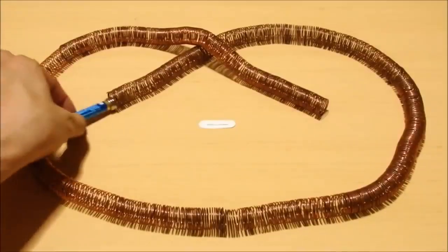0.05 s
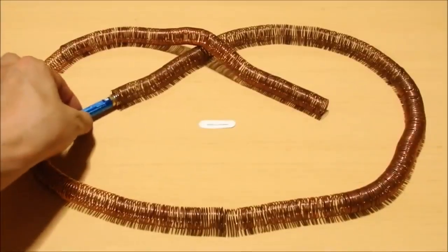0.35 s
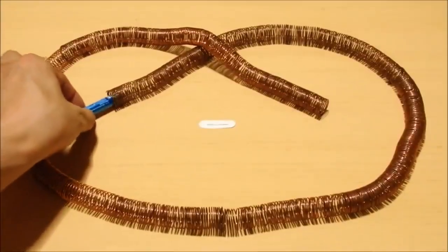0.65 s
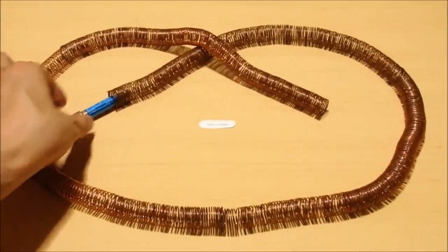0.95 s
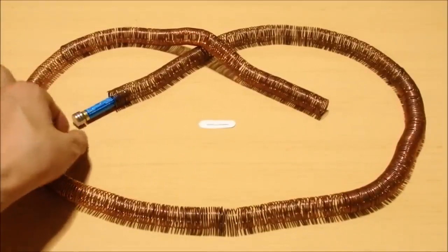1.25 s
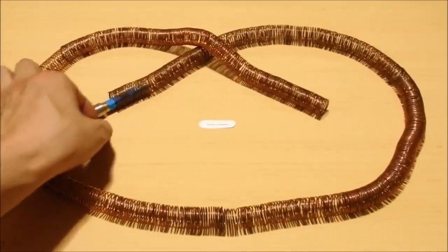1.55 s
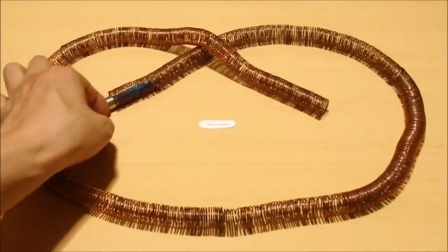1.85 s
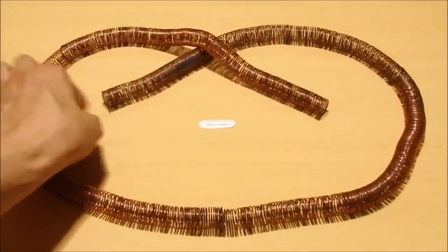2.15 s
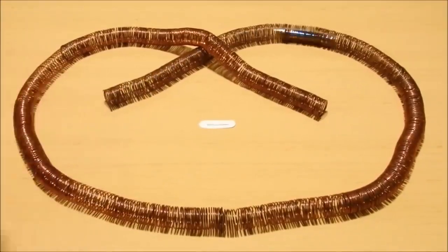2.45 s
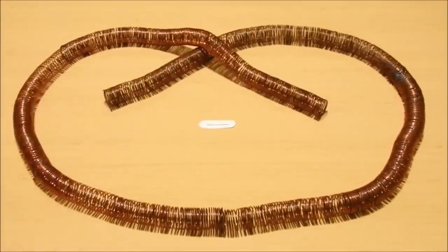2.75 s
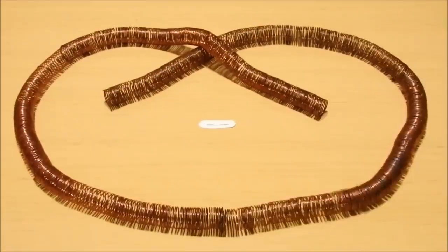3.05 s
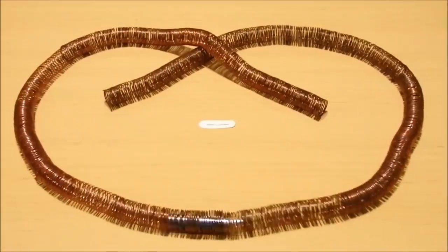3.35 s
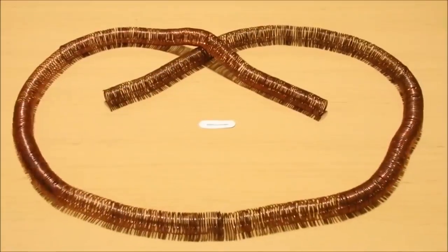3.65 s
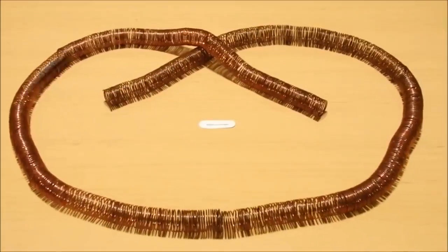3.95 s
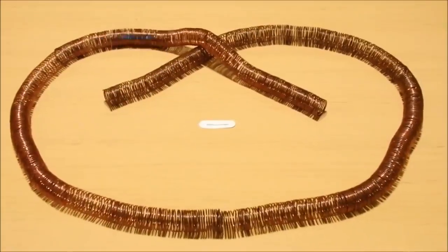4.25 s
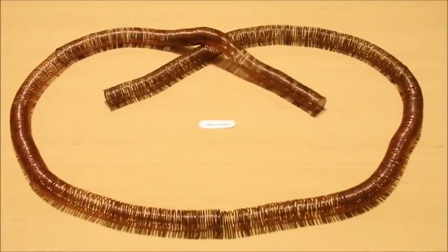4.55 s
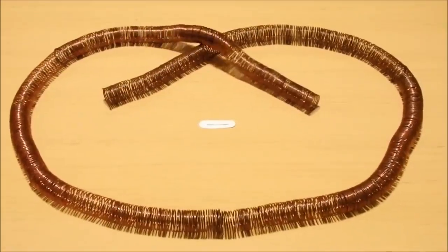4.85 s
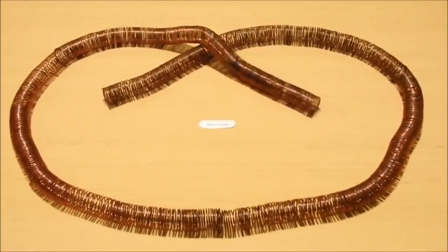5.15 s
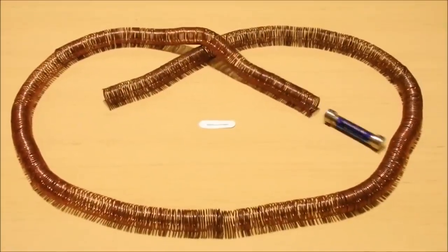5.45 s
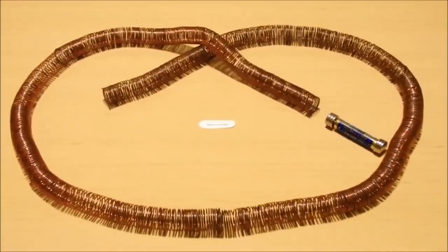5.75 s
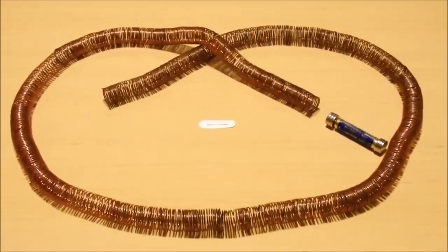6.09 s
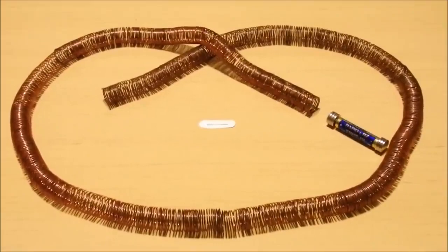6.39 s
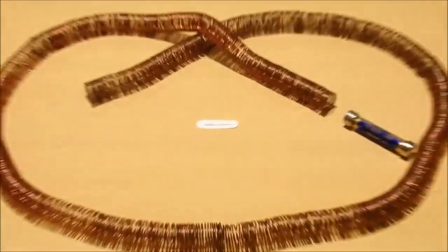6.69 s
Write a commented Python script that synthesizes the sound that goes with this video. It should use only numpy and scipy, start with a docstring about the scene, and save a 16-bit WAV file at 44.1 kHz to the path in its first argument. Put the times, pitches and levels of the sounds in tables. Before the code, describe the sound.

A small battery with magnets clacks into a copper coil, rushes through with a loud metallic rasp, then drops onto a wooden table.

```python
"""A low hum, rumble and hiss fill a small room. With snaps and scrapes, a battery with a magnet on each
end is fed by hand into a bare copper coil on a wooden table. It shoots along, its impacts on the turns
exciting the modes of wire, coil and table; it slows at the crossing, drops out and clacks to rest.
The hum fades midway. At the end a camera is handled: its housing clicks and its zoom whirrs."""
import sys
import numpy as np
from scipy import signal
from scipy.fft import rfft, irfft, next_fast_len
from scipy.io import wavfile
from scipy.ndimage import uniform_filter1d, map_coordinates

SR = 44100
rng = np.random.default_rng(int(sys.argv[2]) if len(sys.argv) > 2 else 0)


def persist_wave(psi):
    """Save psi, clipped to +-1, as 16-bit WAV."""
    counts = np.round(np.clip(psi, -1, 1) * 32767).astype(np.int16)
    wavfile.write(sys.argv[1], SR, np.atleast_2d(counts).T)


N = 300894
TIME = np.arange(N) / SR
LAUNCH_S, EXIT_S, REST_S = 2.17, 5.455, 5.6

# Vigour of the run. Each row: time in seconds, wire level in dB, table level in dB.
RUN_LEVELS = [(2.2, -29, -33), (2.42, -23, -29), (2.46, -22.5, -35), (2.7, -25.5, -31.5),
              (2.75, -24.5, -30.5), (2.83, -25, -40), (2.84, -26, -32.5), (3.02, -29.5, -38.5),
              (3.24, -24, -33.5), (3.31, -29, -40), (3.49, -24, -30.5), (3.51, -27.5, -35.5),
              (3.72, -25.5, -31), (3.76, -24.5, -36.5), (4.14, -23.5, -30), (4.27, -25.5, -37),
              (4.33, -30, -31), (4.48, -24.5, -36.5), (4.56, -25, -33), (4.68, -36, -44.5),
              (4.83, -44, -48.5), (5.15, -37, -45), (5.16, -28.5, -34.5), (5.2, -34.5, -44.5),
              (5.4, -23.5, -30), (5.46, -27, -34)]
# Spectrum of rasping wire. Each row: frequency in Hz, gain in dB.
WIRE_SPECTRUM = [(300, -22), (1200, -26), (2500, -7.5), (4000, -4.5), (5200, 0), (6300, 0), (7300, -0.5),
                 (8800, -3.5), (10000, -8), (12000, -16), (15000, -14.5), (16500, -52)]
# Normal modes of the coil. Each row: frequency in Hz, bandwidth in Hz, gain in dB.
COIL_RESONANCES = [(1946, 112, 3), (2334, 280, 4.5), (2538, 85, 5), (2916, 127, 7.5), (3497, 390, 6),
                   (4045, 360, 4), (4514, 85, 1)]


def from_db(db):
    """Amplitude ratio of a level in decibels."""
    return 10 ** (np.asarray(db) / 20)


def rms_one(x):
    """Normalisation to unit mean power."""
    return x / np.sqrt(np.mean(x ** 2) + 1e-20)


def even(x, window_s=0.14):
    """Normalisation by running power, which keeps the fast grain."""
    power = np.abs(uniform_filter1d(x * x, size=int(window_s * SR)))
    return x / np.sqrt(power + 1e-3 * np.mean(x * x))


def drift(per_s):
    """Slow random modulation of unit power."""
    knots = rng.standard_normal(4096)
    return rms_one(map_coordinates(knots, [TIME * per_s], order=1, mode="wrap"))


def stroke(s, length, attack=0.05, release=0.034):
    """Envelope of a rub: rise until s, hold, exponential decay; all in seconds."""
    rise = np.clip(1 + (TIME - s) / attack, 0, 1) ** 2
    return rise * np.exp(-np.maximum(TIME - s - length, 0) / release)


def colour(x, points):
    """Minimum-phase filtering through (Hz, dB) points, by folding the cepstrum."""
    size = 2 * next_fast_len(len(x) // 2 + 4096)
    hz, db = np.transpose(points)
    grid = np.maximum(np.arange(size // 2 + 1) * SR / size, 1)
    cepstrum = irfft(np.log(from_db(np.interp(np.log(grid), np.log(hz), db))))
    cepstrum[1:size // 2] *= 2
    cepstrum[size // 2 + 1:] = 0
    return irfft(rfft(x, size) * np.exp(rfft(cepstrum)))[:len(x)]


def resonate(x, modes):
    """Superposition of damped resonators, each given as (Hz, bandwidth in Hz, dB)."""
    out = 0
    for hz, width, db in modes:
        r = np.exp(-np.pi * width / SR)
        poles = [1, -2 * r * np.cos(2 * np.pi * hz / SR), r * r]
        out += from_db(db) * (1 - r * r) / 2 * signal.lfilter([1, 0, -1], poles, x + 1e-18)
    return out


def burst(t60):
    """Dense modes decaying together act as damped noise, here of unit energy."""
    t = TIME[:SR // 2]
    ring = rng.standard_normal(len(t)) * from_db(-60 * t / t60)
    return ring / np.linalg.norm(ring)


def travelling(x, t60, size=16384):
    """A moving source meets a changing impulse response: each overlapping stretch gets its own."""
    out, window = np.zeros(N + 4 * size + SR), signal.windows.cosine(size)
    x = np.pad(x, size)
    for start in range(0, N + size, size // 2):
        rung = signal.fftconvolve(x[start:start + size] * window, burst(t60))
        out[start:start + len(rung)] += rung
    return out[size:size + N]


def add(track, s, db, sound):
    """Superpose a sound at s seconds with its loudest 3 ms at the given level."""
    top = np.sqrt(uniform_filter1d(sound ** 2, size=132).max())
    start = int(s * SR)
    track[start:start + len(sound)] += (from_db(db) * sound / top)[:N - start]


def rumble():
    """Room rumble is noise with its power in the bass."""
    # Each row: frequency in Hz, gain in dB.
    spectrum = [(15, -16), (35, -5.5), (55, 5.5), (75, -2.5), (110, -7), (200, -16.5), (350, -25.5),
                (1000, -56.5)]
    return from_db(-49) * rms_one(colour(rng.standard_normal(N), spectrum))


def hum(hz=51.4):
    """A harmonic series wavers by slow frequency and amplitude modulation, and fades midway."""
    # Course of the hum. Each row: time in seconds, level in dB.
    course = [(0, -47.5), (2.2, -40), (3.1, -42), (3.4, -62)]
    # Each row: harmonic number, relative level in dB.
    partials = [(1, -3), (2, -12), (3, -15)]
    phase = 2 * np.pi * np.cumsum(hz * (1 + 0.0096 * drift(5.8))) / SR
    tone = sum(np.sqrt(2) * from_db(db + 2.1 * drift(8.6)) * np.sin(k * phase) for k, db in partials)
    return from_db(np.interp(TIME, *np.transpose(course))) * tone


def hiss():
    """Air and microphone give stationary broadband noise."""
    # Each row: frequency in Hz, gain in dB.
    spectrum = [(150, -45), (250, -4.5), (434, -10.5), (614, 1.5), (692, -6.5), (768, 0.5), (913, -14),
                (1140, -3), (1270, -13), (1380, -6), (1760, -12.5), (2660, -13), (3890, -7), (10100, -13.5),
                (15500, -17.5)]
    return from_db(-56) * rms_one(colour(rng.standard_normal(N), spectrum))


def snaps(wire, catches_per_s=8, catch_db=9.5, spread_db=3):
    """Brief contact gives a bright spectrum: a magnet snaps on the wire, with lesser random catches."""
    # Each row: start in seconds, relative level in dB.
    main_snaps = [(0.220, -39), (0.545, -26), (0.607, -29), (2.158, -19), (2.1688, -10.5), (2.495, -4),
                  (2.61, -7.5), (2.791, -8.5), (2.875, -10), (3.036, -14), (3.84, -8), (4.008, -12),
                  (4.43, -9), (4.880, -23), (5.158, -8.5), (5.381, -9.5)]
    # Each row: frequency in Hz, gain in dB.
    spectrum = [(500, -27), (2000, -24), (4500, -2), (7000, 9.5), (9000, 2.5), (12000, -6), (16000, -52.5)]
    out = np.zeros(N)
    when, strength = rng.random((int(catches_per_s * (EXIT_S - LAUNCH_S)), 2)).T
    times = LAUNCH_S + when * (EXIT_S - LAUNCH_S)
    levels = 20 * np.log10(np.interp(times, TIME, wire)) + catch_db + spread_db * (2 * strength - 1)
    for s, db in [*main_snaps, *zip(times, levels)]:
        add(out, s, db - 7, colour(burst(t60=0.013), spectrum))
    return out


def tabletop(force, near):
    """The driving point (0 far side, 1 near side) sets how strongly each mode of the table responds."""
    # Each row: frequency in Hz, bandwidth in Hz, gain in dB struck far, gain in dB struck near.
    modes = [(79, 26, -19, -2.5), (137, 26, -11, -5), (184, 32, -3, -6.5), (230.3, 23.6, 4, 1.5),
             (302, 46, -2, -6.5), (356, 36.4, 1.5, -7), (436, 23, -2.5, -13), (506, 46, -3, -9),
             (627, 144, -13.5, -15.5), (770, 93, -10.5, -11.5), (987, 103, -17, -14), (1301, 73, -16, -17)]
    near = np.clip(near, 0, 1)
    return sum((-1) ** k * from_db(far_db + near * (near_db - far_db)) * resonate(force, [(hz, width, 0)])
               for k, (hz, width, far_db, near_db) in enumerate(modes))


def table_thud():
    """Impulse response of the table: ringing modes over a dead thump."""
    # Each row: frequency in Hz, gain in dB.
    thump_spectrum = [(60, -13.5), (220, -2), (400, -3), (600, -2), (950, 1), (1200, -9), (3000, -39.5)]
    blow = signal.unit_impulse(SR // 2)
    return tabletop(blow, near=0.21) + from_db(-7) * colour(blow, thump_spectrum)


def hand_bumps(cutoff_hz=420):
    """Soft flesh damps the treble of a blow on the table, acting as a low-pass filter."""
    # Each row: start in seconds, level in dB.
    bumps = [(0.335, -43), (1.39, -41), (1.61, -39), (1.712, -28.5)]
    out = np.zeros(N)
    soft_thud = signal.sosfilt(signal.butter(2, cutoff_hz, fs=SR, output="sos"), table_thud())
    for s, db in bumps:
        add(out, s, db, soft_thud)
    return out


def rasp(per_s, spread_db, ring_t60, rub_db):
    """Shot noise: random contacts excite wire modes over steady friction. Returns clicks and ringing."""
    touched = rng.random(N) < per_s / SR
    strength = from_db(spread_db * np.clip(rng.standard_normal(N), -2, 2))
    clicks = touched * strength * rng.choice([-1, 1], N)
    decay = np.exp(-np.log(1e6) / (ring_t60 * SR))
    energy = signal.lfilter([1], [1, -decay], clicks ** 2 + 1e-12)
    share = energy / uniform_filter1d(energy, size=SR // 12)
    return clicks, np.sqrt(np.abs(share) + from_db(rub_db) ** 2) * rng.standard_normal(N)


def coil_mouth():
    """Friction sustains a narrow resonance of the free turns at the mouth of the coil."""
    # Each row: frequency in Hz, bandwidth in Hz, gain in dB.
    modes = [(2306, 11, 0)]
    return even(resonate(rng.standard_normal(N), modes))


def feeding(hand_from_s=0.24, hand_db=-54.5):
    """Frictional excitation: the slowly pushed magnet catches on single turns; the hand rubs the wood."""
    # Each row: start in seconds, length in seconds, wire level in dB, table level in dB.
    pushes = [(0.56, 0.004, -52, -71), (0.603, 0.034, -51, -58), (0.883, 0.064, -60.5, -52),
              (1.594, 0.12, -49, -39), (1.795, 0.027, -54.5, -32.5), (2.095, 0.077, -54.5, -42.5)]
    wire, table = sum(np.outer(from_db(levels), stroke(s, length)) for s, length, *levels in pushes)
    _, rings = rasp(per_s=98, spread_db=12.5, ring_t60=0.0077, rub_db=7.0)
    ticks = from_db(0.5) * even(colour(rings, WIRE_SPECTRUM))
    coil = from_db(3.5) * even(resonate(rings, COIL_RESONANCES))
    zing = from_db(-4) * even(resonate(rings, [(6290, 53, 26), (6740, 190, -30)]))  # single turns
    wood = even(tabletop(rng.standard_normal(N), near=0))
    hand = from_db(hand_db) * stroke(hand_from_s, LAUNCH_S - hand_from_s, attack=0.15)
    sing = from_db(-3) * coil_mouth()
    return wire * (ticks + coil + zing + sing) + wood * (from_db(-4) * table + hand)


def knocks(rebound_s=0.0105, rebounds=3):
    """Impact and rebound: the battery's ends strike in turn, each with a clack, thud and metal crack."""
    # Each row: start in seconds, clack level in dB, clack centre in Hz, thud level in dB,
    # crack level in dB, the clack's loss per rebound in dB.
    impacts = [(0.896, -46, 2350, -40, -54, 14), (1.011, -41, 2400, -35, -53, 14),
               (1.0211, -17, 2400, -17.5, -23, 7.5), (1.71, -43, 2000, -31.5, -39, 4),
               (1.817, -34, 2140, -28, -33.5, 3), (3.04, -39, 1400, -30, -38, 5),
               (3.166, -31, 1710, -26.5, -44, 6), (3.43, -36.5, 1700, -31, -43, 7),
               (3.465, -34.5, 1510, -28, -30, 7), (3.67, -40, 1820, -32, -41, 0),
               (3.887, -31, 1650, -25.5, -20, 9), (4.14, -35, 1800, -25, -29, -0.5),
               (4.554, -33, 1710, -34, -38.5, 6), (5.4761, -17, 4170, -28, -14, 6),
               (5.606, -15, 3230, -20, -24, 1)]
    # Each row: frequency in Hz, gain in dB.
    crack_spectrum = [(500, 5), (1500, 9.5), (4000, 13), (7000, 8), (9000, -2), (12000, -20), (16000, -37)]
    out, thud = np.zeros(N), table_thud()
    for s, clack_db, hz, thud_db, crack_db, loss_db in impacts:
        band = signal.butter(3, [hz * 0.69, min(hz * 1.27, SR / 3)], "band", fs=SR, output="sos")
        gaps = rebound_s * rng.uniform(0.8, 1.2, rebounds)
        for k, at in enumerate(s + np.cumsum([0, *gaps])):
            strike = burst(t60=0.06) + from_db(-2) * burst(t60=0.012)  # ring and hard onset
            add(out, at, clack_db - k * loss_db, signal.sosfilt(band, strike))
            add(out, at, thud_db - k * (loss_db + 2.5), thud)
            add(out, at, crack_db - k * (loss_db - 1), colour(burst(t60=0.023), crack_spectrum))
    return out


def vigour(uneven_db=1.12):
    """Envelopes of wire and table from launch to exit, modulated by the uneven spacing of the turns."""
    times, *levels = np.transpose(RUN_LEVELS)
    inside = stroke(LAUNCH_S, EXIT_S - LAUNCH_S, attack=0.01, release=0.0043)
    flutter_db = uneven_db * drift(per_s=14)
    return [inside * from_db(np.interp(TIME, times, db) + flutter_db) for db in levels]


def running(wire, table, skid_loss_db_per_s=19.5, mouth_loss_db_per_s=12.5):
    """Forced vibration of wire, coil and table: contacts grow louder and denser with speed, then skid."""
    # The battery's path. Each row: time in seconds, position from 0 (far side) to 1 (near side).
    path = [(2.2, 0.15), (2.9, 0.19), (3.2, 0.87), (3.55, 0.85), (4.15, 0.5), (5.6, 0.48)]
    near = np.interp(TIME, *np.transpose(path))
    skid = stroke(EXIT_S, REST_S - EXIT_S, attack=0.0091)
    skid *= from_db(-skid_loss_db_per_s * np.maximum(TIME - EXIT_S, 0))
    scrape = from_db(-28.5) * skid
    mean_wire = from_db(np.mean(RUN_LEVELS, axis=0)[1])
    body = from_db(-35.5) * (wire / mean_wire) ** 0.73  # the coil's level swings less than the wire's
    speed = np.clip(np.sqrt((wire + scrape) / wire.max()), 0.15, 1)
    clicks, rings = rasp(per_s=750 * speed, spread_db=2.5, ring_t60=0.017, rub_db=0)
    # The turns around the battery ring at pitches that change from place to place.
    turns = rings + from_db(-9.5) * travelling(rings, t60=0.033, size=8192)
    ticks = from_db(-0.5) * (wire + from_db(-8) * scrape) * even(colour(turns, WIRE_SPECTRUM))
    coil = (body + from_db(-0.5) * scrape) * even(resonate(rings, COIL_RESONANCES))
    wood = (from_db(0.5) * table + from_db(-28) * skid) * even(tabletop(clicks, near))
    mouth_db = -15 - mouth_loss_db_per_s * np.maximum(TIME - LAUNCH_S, 0)  # the battery draws away
    sing = wire * from_db(mouth_db) * coil_mouth()
    return ticks + coil + wood + sing


def camera(zoom_s=6.75, zoom_db=-40.5):
    """Structure-borne sound: dry clicks pass through the housing, then the zoom whirrs and settles."""
    # Each row: start in seconds, relative level in dB.
    clicks = [(6.2812, -35), (6.5018, -22), (6.5992, -27), (6.603, -24), (6.718, -24.5), (6.752, -30)]
    # Each row of both spectra: frequency in Hz, gain in dB.
    click_spectrum = [(200, -2), (800, -12), (1500, 8), (3000, -5.5), (6000, 0.5), (10000, -3),
                      (16000, -14)]
    whirr_spectrum = [(100, 14.5), (700, 0), (2500, -6), (4000, 2.5), (8500, 2), (11000, -14), (16000, -17)]
    whirr = rms_one(colour(rng.standard_normal(N), whirr_spectrum))
    out = from_db(zoom_db) * stroke(zoom_s, 0, attack=0.008, release=0.051) * whirr
    for s, db in clicks:
        add(out, s, db - 11.5, colour(burst(t60=0.0099), click_spectrum))
    return out


def room(dry, wet_db, t60=0.32):
    """Direct sound plus a diffuse field that differs between the microphones. Returns mid and side."""
    late, wet = np.roll(dry, shift=SR // 300), from_db(wet_db)
    mid = dry + wet * travelling(late, t60)
    side = signal.oaconvolve(dry, burst(t60=0.012))[:N] + wet * travelling(late, t60)
    return np.array([mid, side]) / np.sqrt(1 + wet * wet)


def scene():
    """Superposition at two close microphones, where the battery's sound is coherent in the bass."""
    # Stereo width of the room's sound, and of hiss and camera.
    # Each row: frequency in Hz, side against mid in dB.
    room_width = [(60, -52), (400, -23), (1200, -47), (2800, -16), (5600, -9), (12000, -8)]
    hiss_width = [(250, -1), (700, -7.5), (1400, -22.5), (2500, -1.5), (6000, -2.5), (12000, -5.5)]
    # Channel balance. Each row: frequency in Hz, left over right in dB.
    balance = [(50, 2.3), (250, 1.6), (500, 1.2), (1000, 0.4), (5000, -0.1), (15000, 0.1)]
    wire, table = vigour()
    sliding = room(feeding() + running(wire, table), wet_db=-5.5)
    snapping = room(snaps(wire), wet_db=-11.0)
    knocking = from_db(2) * room(hand_bumps() + knocks(), wet_db=0.5)
    mid, side = sliding + snapping + knocking
    mid = mid + rumble() + hum() + hiss() + camera()
    side = colour(side, room_width) + colour(hiss() + camera(), hiss_width)
    return np.array([colour(mid + sign * side, [(hz, sign * db / 2) for hz, db in balance])
                     for sign in (1, -1)])


def record(dry, cutoff_hz=15600):
    """Band limiting: an elliptic low-pass filter cuts the top steeply."""
    return signal.sosfilt(signal.ellip(10, 0.1, 80, cutoff_hz, fs=SR, output="sos"), dry)


dry = scene()
out = record(dry)
persist_wave(out)
```